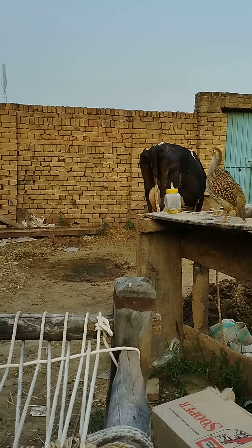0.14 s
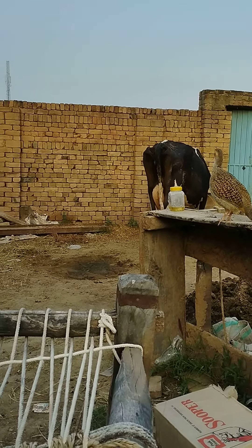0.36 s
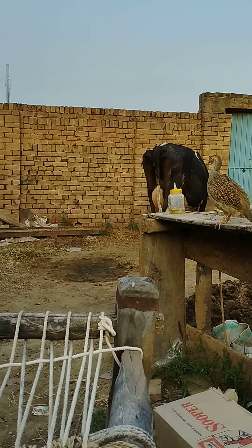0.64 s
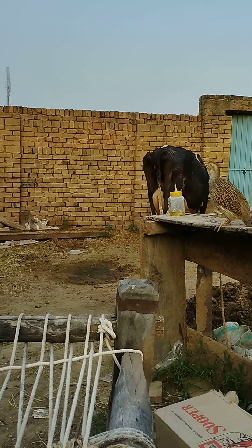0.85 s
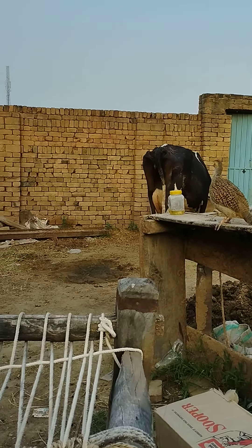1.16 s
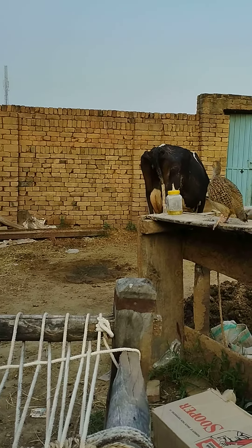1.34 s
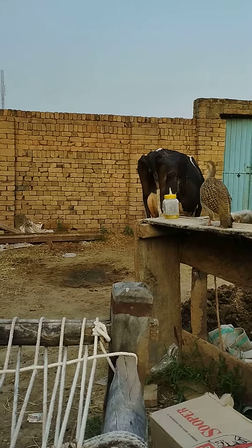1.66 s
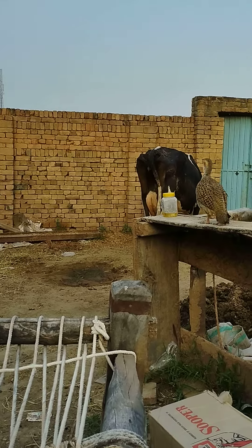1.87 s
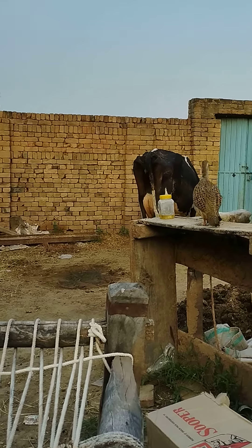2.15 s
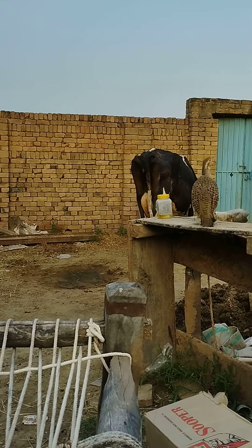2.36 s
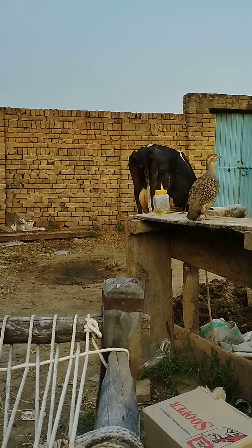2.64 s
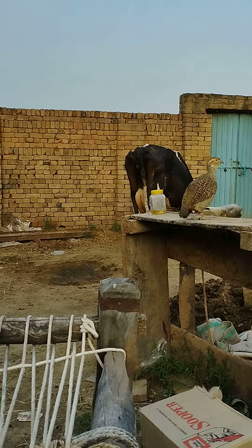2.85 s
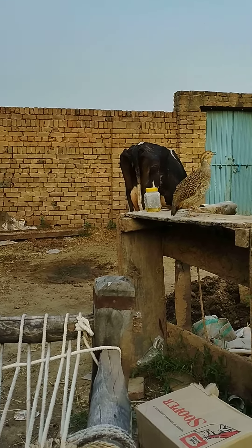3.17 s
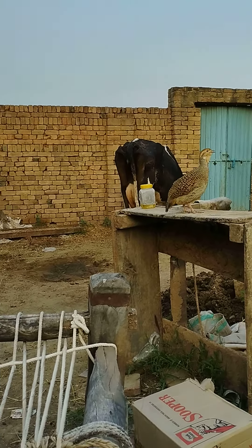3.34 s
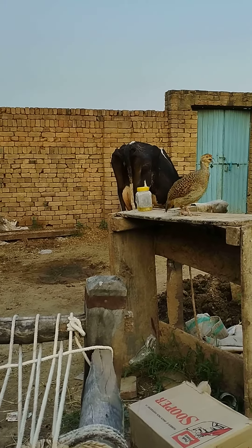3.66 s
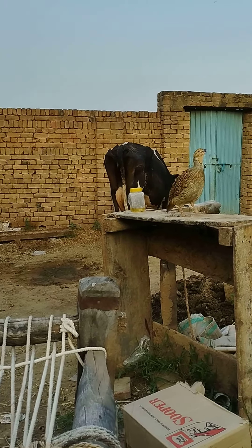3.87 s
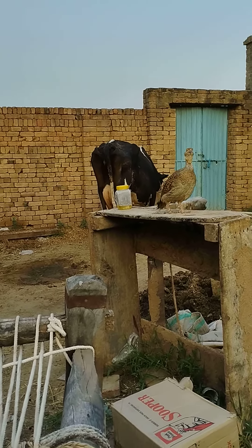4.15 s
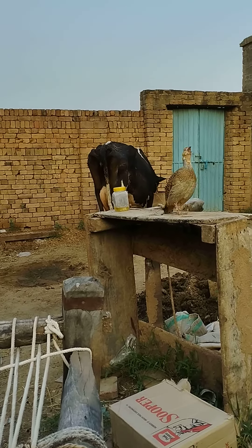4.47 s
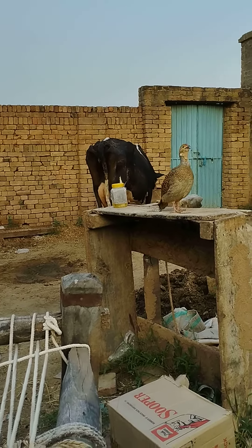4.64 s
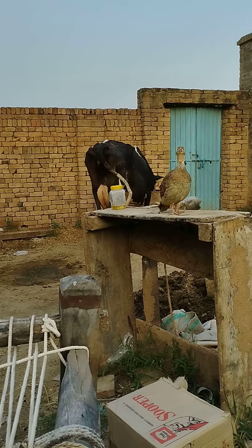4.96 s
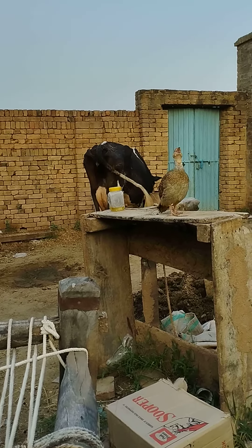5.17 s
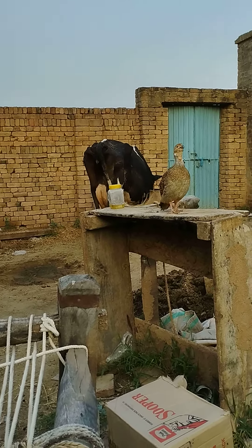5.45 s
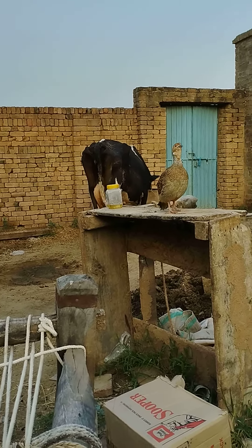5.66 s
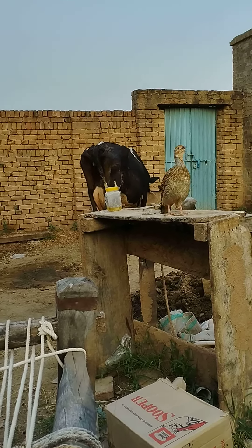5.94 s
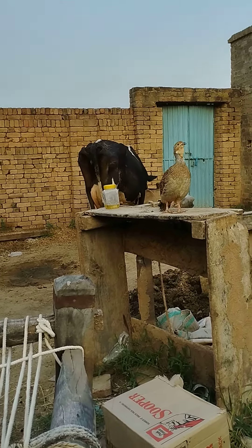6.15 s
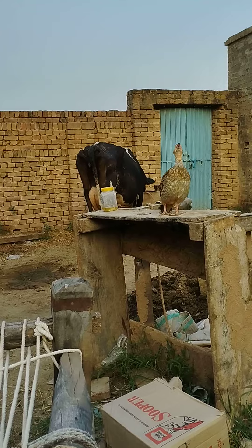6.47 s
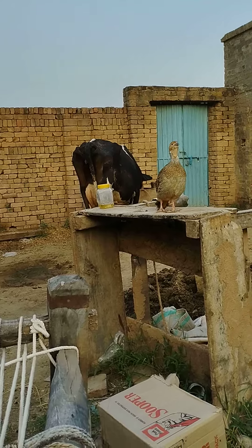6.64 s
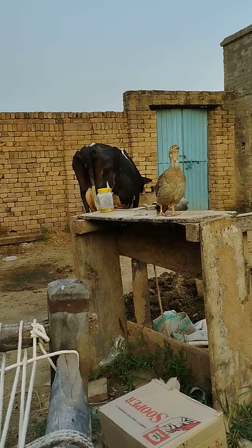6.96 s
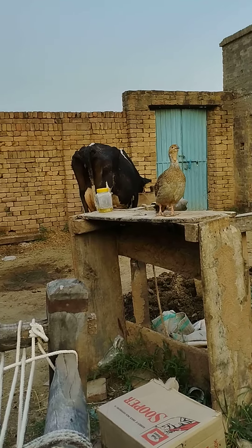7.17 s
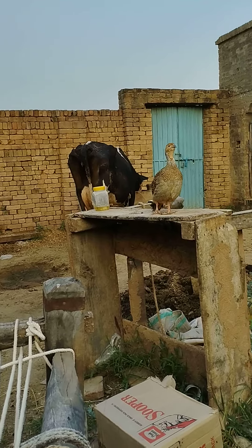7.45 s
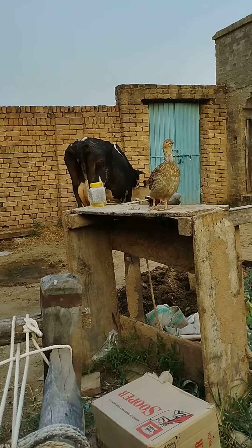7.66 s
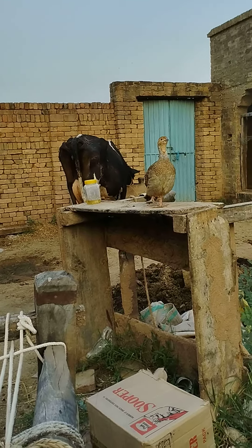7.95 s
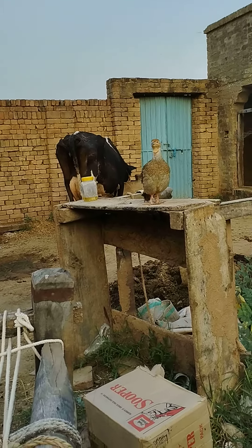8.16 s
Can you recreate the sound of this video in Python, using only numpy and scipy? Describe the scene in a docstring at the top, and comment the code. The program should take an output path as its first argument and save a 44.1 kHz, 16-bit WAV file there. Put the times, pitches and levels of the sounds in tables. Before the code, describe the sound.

Outdoors in a brick-walled yard, two francolins duet loudly from the very start. Each round lasts about 0.7 seconds: a pure, piercing whistle near 2.9 kHz holds for a tenth of a second and flicks upward; a second bird immediately answers with a harsh rasp, short low note, higher note, another rasp and a fast falling note, then two hoarse clucks. Ten rounds run to about 6.9 seconds, slightly quickening, the cackle growing brighter and harsher. Walls return quick echoes and a short tail. A low engine drone hums steadily until about 4 seconds, then fades; soft yard murmur and a very faint pulsing cricket remain. Dull knocks bump near the microphone around 1.4, 2.1 and 2.8 seconds, fainter later. A final whistle comes at 7.0 without an answer. In the quiet, a tiny high chirp sounds near 7.6, with dry ticks from 7.5, clearest at 7.9, until 8.3.

```python
"""Two francolins duet in a walled yard, over an engine drone that later fades and a pulsing cricket.
First comes a pure whistle, a near-sinusoid that bends up at its end; each cackle then answers with a rasp, low note,
high note, rasp and falling note (aperiodic pulses and harmonic tones), followed by two hoarse clucks.
Brick walls return the calls as discrete echoes and a diffuse tail. Dull knocks, decaying sine waves, start later.
Near the end come dry ticks, short noise bursts, and one chirp of a small bird, a gliding sine."""
import sys
import numpy as np
from scipy import signal
from scipy.fft import rfft, irfft, next_fast_len
from scipy.io import wavfile
from scipy.ndimage import uniform_filter1d, minimum_filter1d, map_coordinates

SR = 44100
rng = np.random.default_rng(int(sys.argv[2]) if len(sys.argv) > 2 else 0)


def dump(signal):
    """Clip the signal to [-1, 1] and save it as 16-bit WAV at the path in sys.argv[1]."""
    limited = np.clip(np.atleast_2d(signal).T, -1, 1)
    pcm = np.round(limited * 32767).astype(np.int16)
    wavfile.write(sys.argv[1], SR, pcm)


N = 366471
T = np.arange(N) / SR

# Levels in the tables are relative: envelopes, fluctuation and mix gains follow.
# Whistles: full voice at t/s, hold/s, bend/s, first f/Hz, held f/Hz, last f/Hz, first level/dB, held level/dB,
# left-right level/dB, left lead/us. Each f is the sounding pitch.
WHISTLES = [(-0.07, 0.1, 0.021, 2910, 2940, 3230, -16, -14.5, 7.5, 59),
            (0.649, 0.1, 0.059, 2927, 2918, 3270, -15.5, -12, 2, 62),
            (1.433, 0.11, 0.035, 3007, 2956, 3280, -15, -13, 6, 60.5),
            (2.162, 0.096, 0.048, 2943, 2963, 3330, -15, -14, 6.5, 56.5),
            (2.906, 0.12, 0.058, 2950, 2925, 3390, -16, -13, 3.5, 53.5),
            (3.636, 0.12, 0.038, 2932, 2957, 3190, -16, -14, 4, 27),
            (4.324, 0.13, 0.044, 2923, 2978, 3360, -15.5, -15, 4.5, 7),
            (5.033, 0.12, 0.037, 2958, 2922, 3280, -17, -14.5, 1.5, 4),
            (5.737, 0.11, 0.049, 2982, 2941, 3150, -17.5, -15, 3.5, -9.5),
            (6.355, 0.09, 0.058, 2903, 2915, 3250, -14, -12.5, 0.8, -7.5),
            (6.969, 0.11, 0.046, 2932, 2966, 3380, -15.5, -15, 3, -30)]
# Faint broadband noise that rises and falls with the whistle: f/Hz, spectral level/dB per Hz
NOISE_SPECTRUM = [(300, -1), (1750, 1), (2600, -11), (3500, -3), (4100, 3.5), (4700, -6), (6050, -6),
                  (7370, -18.5), (7900, -44), (9290, -20), (11100, -29), (15500, -12)]
# Other partials against the main one: f/Hz, level/dB
OVERTONES = [(800, -27), (1700, -22.5), (3300, -15), (4060, -14), (5070, -8.5), (6100, -19.5), (7260, -23),
             (8560, -50), (9940, -38.5), (10900, -50), (12500, -33.5), (15500, -41)]
# Background: t/s, engine level/dB, yard murmur level/dB, ground rumble level/dB
BACKGROUND = [(0.0, -51.5, -55.5, -60.5), (1.25, -51, -55, -60.5), (3.77, -52.5, -58, -59.5),
              (4.6, -64.5, -59.5, -63.5), (5.2, -68, -58, -64.5), (6.5, -76.5, -59.5, -68.5),
              (7.15, -67, -55.5, -62), (7.4, -66, -64, -65), (8.31, -69.5, -64, -64)]
# Background spectra: f/Hz, spectral level/dB per Hz
ENGINE_SPECTRUM = [(42, -37.5), (72, -4.5), (119, 6), (188, -12.5), (260, -18), (340, -45), (570, -120)]
RUMBLE_SPECTRUM = [(25, -9), (33, -6), (41, 9.5), (52, -8), (80, -47.5)]
YARD_SPECTRUM = [(53, -30), (90, 0), (195, -17.5), (237, -6), (357, -11), (727, -16), (2770, -32),
                 (5880, -42), (6550, -39), (7600, -56), (10300, -58), (15500, -44)]
# Rasps of the cackle: t/s, peak level/dB, length/s, treble level/dB
RASPS = [(0.0264, -11.5, 0.033, -11.5), (0.102, -19.5, 0.036, 3.5), (0.79, -12.5, 0.028, -12.5),
         (0.863, -17.5, 0.024, 4), (1.5894, -12.5, 0.026, -30), (1.6713, -19, 0.023, 2),
         (2.2852, -12, 0.034, -24.5), (2.3627, -13, 0.017, -0.5), (3.035, -13.5, 0.039, -0.5),
         (3.112, -12.5, 0.012, 0.5), (3.756, -10.5, 0.026, 1.5), (3.833, -14, 0.017, 0),
         (4.443, -10.5, 0.026, 2), (4.523, -13.5, 0.011, -0.5), (5.2516, -10, 0.034, 2),
         (5.328, -12, 0.018, 0), (5.876, -11, 0.035, 2), (5.9435, -16, 0.023, 3), (6.5045, -8, 0.0314, 4.5),
         (6.5816, -10.5, 0.02, 3.5)]
# Throat resonances in the rasp: f/Hz, spectral level/dB per Hz
RASP_THROAT = [(500, -37), (1000, -9.5), (1300, -16), (2050, 2.5), (3300, -3), (4250, -9), (5300, -3.5),
               (7000, -14.5), (8500, -35.5), (10000, -29), (11200, -50.5), (12500, -28.5), (15500, -39.5)]
# Top treble of the cackle: t/s, level/dB
CACKLE_TOP = [(0, -3.5), (1.6, -10), (2.3, -4), (3.8, 1.5), (4.5, 2), (6.6, 0.5)]
# Direct sound of cackle and clucks: f/Hz, left-right level/dB
CACKLE_PAN = [(700, -0.5), (1220, 1.5), (2010, -4), (4400, -7.5), (8000, -4), (15000, 6.5)]
# First wall echoes: left delay t/s, level/dB
WALLS = [(.034, -11.5), (.047, -23.5), (.071, -34.5)]
# Low notes of the cackle: t/s, length/s, f/Hz (the sounding pitch), first level/dB, last level/dB
LOW_NOTES = [(0.06, 0.0093, 2072, -11.5, -16.5), (0.824, 0.011, 2101, -12, -12),
             (1.621, 0.014, 2076, -14.5, -13), (2.32, 0.009, 2157, -15.5, -16.5),
             (3.068, 0.016, 2087, -12.5, -16), (3.785, 0.017, 2050, -13, -19.5),
             (4.472, 0.026, 2070, -15, -14.5), (5.278, 0.027, 2044, -17, -13),
             (5.909, 0.019, 2050, -16, -15), (6.535, 0.023, 2073, -15, -16.5)]
# High notes, every third cycle stronger: t/s, length/s, f/Hz, last f/Hz, level/dB
HIGH_NOTES = [(0.072, 0.046, 2534, 2497, -21), (0.838, 0.027, 2543, 2630, -20),
              (1.638, 0.038, 2550, 2477, -22), (2.332, 0.03, 2500, 2620, -17),
              (3.09, 0.023, 2536, 2484, -21.5), (3.806, 0.026, 2565, 2420, -18.5),
              (4.497, 0.021, 2513, 2214, -16.5), (5.31, 0.019, 2496, 1845, -15.5),
              (5.932, 0.018, 2428, 1842, -17), (6.557, 0.02, 2485, 2004, -16.5)]
# Falling notes: t/s, hold/s, drop/s, first f/Hz, f/Hz before the drop, first level/dB, level/dB before the drop,
# level/dB in the drop, landing level/dB
FALLS = [(0.116, 0.022, 0.022, 2030, 2074, -15, -13.5, -42, -27),
         (0.882, 0.023, 0.024, 2250, 2406, -20, -20, -38, -25),
         (1.686, 0.022, 0.019, 2508, 2307, -18, -22.5, -35, -25),
         (2.379, 0.026, 0.018, 2085, 1902, -12.5, -12, -36.5, -24.5),
         (3.127, 0.018, 0.026, 2057, 1992, -12.5, -11, -18.5, -22),
         (3.844, 0.019, 0.025, 2095, 1986, -20, -11.5, -15.5, -22),
         (4.532, 0.022, 0.017, 2089, 1894, -17.5, -11, -17.5, -22.5),
         (5.345, 0.024, 0.012, 2038, 1820, -18, -12.5, -19.5, -20),
         (5.964, 0.024, 0.011, 2030, 1820, -16.5, -12.5, -22, -19),
         (6.596, 0.021, 0.015, 2067, 1803, -16, -13, -25.5, -24)]
# Clucks: t/s, hoarse peak level/dB, treble level/dB, delay/s to the voice peak, f/Hz, last f/Hz,
# voice level/dB, voice fade/s
CLUCKS = [(0.2781, -20.5, 6, 0.03, 1427, 1385, -17.5, 0.0048),
          (0.4426, -18.5, 2, 0.025, 1321, 1057, -28, 0.023),
          (1.047, -25, 16.5, 0.032, 1487, 1400, -18.5, 0.0046),
          (1.214, -17.5, -2, 0.029, 1241, 1124, -31.5, 0.03),
          (1.845, -20.5, 9.5, 0.028, 1413, 1380, -22, 0.005),
          (2.0073, -17.5, -1, 0.02, 1306, 1150, -30.0, 0.023),
          (2.5483, -22, 8.5, 0.025, 1459, 1418, -18.5, 0.0093),
          (2.7107, -17.5, -3.5, 0.024, 1242.0, 1200, -25, 0.011),
          (3.2995, -20.5, 12.5, 0.033, 1353, 1360, -23.5, 0.0045),
          (3.4663, -19, -1.5, 0.021, 1210, 1110, -26.5, 0.03),
          (4.0232, -18.5, 8, 0.021, 1400, 1360, -22, 0.007),
          (4.1771, -17, -1.5, 0.026, 1239, 1068, -30, 0.03),
          (4.6993, -19.5, 10, 0.028, 1348, 1290, -20.5, 0.007),
          (4.862, -15, -4.5, 0.033, 1219, 1158, -28.5, 0.009),
          (5.5017, -17.5, 8, 0.031, 1366, 1117, -26, 0.03),
          (5.6553, -17, -7.5, 0.031, 1176, 1056, -31.5, 0.026),
          (6.1192, -18.5, 8.0, 0.031, 1213, 1080, -27, 0.023),
          (6.277, -17.0, -11, 0.029, 1155, 1093, -34, 0.025),
          (6.748, -16.0, 6.5, 0.026, 1373.0, 1073, -24.5, 0.023),
          (6.904, -17.5, -13, 0.031, 1133, 1050, -30.5, 0.022)]
# Throat resonances in the cluck: f/Hz, spectral level/dB per Hz
CLUCK_THROAT = [(180, -42.5), (300, -10), (603, -15), (1730, 0), (2170, -14.5), (2920, -18.5), (3890, -23),
                (5790, -19.5), (9000, -52.5), (11700, -88.5), (19800, -120)]
# Thin bright notes that end some clucks: t/s, length/s, first f/Hz, last f/Hz, level/dB
SQUEAKS = [(0.313, 0.025, 1964, 1830, -31), (1.077, 0.029, 2028, 1960, -31),
           (1.88, 0.028, 1985, 1840, -35.5), (2.58, 0.028, 1978, 1790, -33.5),
           (3.338, 0.018, 1980, 1790, -30), (4.05, 0.022, 1902, 1760, -31.5),
           (4.732, 0.019, 1822, 1760, -34)]
# Dull knocks: t/s, peak level/dB, f/Hz
THUMPS = [(1.374, -32.5, 281), (2.076, -32.5, 200), (2.827, -34, 220), (4.958, -51, 180), (5.677, -38, 250),
          (7.18, -42, 150)]
# Dry ticks: t/s, level/dB
TICKS = [(7.466, -57), (7.5293, -53), (7.84, -57), (7.885, -46), (7.9136, -35.5), (8.135, -60)]
# Chirp of a small bird: t/s, f/Hz, level/dB
CHIRP = [(7.555, 5040, -79), (7.58, 4870, -57), (7.66, 4930, -72.5), (7.9, 4820, -83)]

WHISTLE_START_S, WHISTLE_START_DB, WHISTLE_FLAT_HZ = .045, -39.5, 48.6   # faint, slightly flat start
WHISTLE_RISE_S, WHISTLE_RISE_DB = 0.013, -5   # last stretch of the attack
WHISTLE_ENDS_DB = -0.5   # the hold eases after its middle
BEND_KNEE, BEND_KNEE_PITCH, BEND_KNEE_DB, BEND_END_DB = .58, .3, -5.5, -13.5   # the bend steepens and fades
CRICKET_HZ, CRICKET_DB = 6500, -74.5
TOP_PARTIAL_HZ = 9900   # above this the voice is mostly hiss
AIR_DB, AIR_LINGERS_S = -4, .012   # that hiss follows the cry and lingers
PORT_LAG_S = .0001
YARD_T60_S, YARD_CUT_HZ = 0.32, 5130
HIGH_HOLD = .62   # share of the note held before the pitch moves to its last value
FALL_SAG_EARLY = 0.44   # share of the slow sag done at mid-hold
DROP_KNEE, DROP_KNEE_PITCH = 0.74, .45   # share of the drop's time and depth at its knee
LANDING_HZ, LANDING_S, LANDING_FADE_DB = 1397, 0.0083, -2   # every fall lands on one short tone
CLUCK_SWELL_S, CLUCK_SWELL_DB, CLUCK_FADE_DB = .017, -12.5, -8
CLUCK_SHARP_HZ, CLUCK_SAG_SHARE = 60, .4   # starts sharp; the sag is done after this share of the fade
THUMP_S = 0.002   # rise time of the knock's envelope
CEILING, CUTOFF_HZ = .9, 15800


def amp(db):
    """The decibel: an amplitude ratio is 10 to the power level/20."""
    return 10 ** (np.asarray(db) / 20)


def rms_one(x):
    """Normalisation to unit root mean square."""
    return x / np.sqrt(np.mean(x ** 2) + 1e-20)


def in_time(rows):
    """Linear interpolation of table columns to one value per sample."""
    s, *columns = np.transpose(rows)
    return [np.interp(T, s, column) for column in columns]


def at_hz(points, hz):
    """Interpolation of a spectrum on a logarithmic frequency axis."""
    table_hz, table_db = np.transpose(points)
    return np.interp(np.log(hz), np.log(table_hz), table_db)


def filtered(x, order, hz, kind):
    """Butterworth filtering: a maximally flat passband."""
    return signal.sosfilt(signal.butter(order, hz, kind, fs=SR, output="sos"), x)


def coloured(x, spectrum):
    """Spectral shaping by a tabulated response that also falls off below its first frequency."""
    size = next_fast_len(N, real=True)
    grid = np.maximum(np.fft.rfftfreq(size, 1 / SR), 1)
    gain = amp(at_hz(spectrum, grid)) * np.minimum(grid / spectrum[0][0], 1) ** 2
    return rms_one(irfft(rfft(x, size) * gain, size)[:N])


def drift(rate_hz):
    """Slow random fluctuation of unit rms: low-passed white noise."""
    return rms_one(filtered(rng.standard_normal(N), 2, rate_hz, "low"))


def brighten(x, db, corner_hz, kind="high"):
    """Directivity: treble grows when the beak points at the listener; kind "low" scales the lows instead."""
    return x + (amp(db) - 1) * filtered(x, 2, corner_hz, kind)


def notes(tables, multiples, wobble, shimmer_db, edge_s, overtone_db, between_db=0, broken_db=0):
    """Membrane oscillation: partials on (t/s, f/Hz, level/dB) curves, slightly unsteady, coloured by the beak."""
    out, waver, shimmer = np.zeros(N), drift(250), np.clip(drift(200), -2, 1)
    for rows in tables:
        s, hz, db = np.transpose(rows)
        on = slice(max(int((s[0] - edge_s) * SR), 0), int((s[-1] + edge_s) * SR))
        t = T[on]
        pitch = np.interp(t, s, hz)
        curve_db = np.interp(t, s, db)
        phase = 2 * np.pi * np.cumsum(pitch * (1 + wobble * waver[on])) / SR
        edge = np.clip(np.minimum(t - s[0], s[-1] - t) / edge_s + 1, 0, 1) ** 2
        wave = np.sin(phase)
        effort_db = 0.16 * (curve_db - db.max())   # soft stretches are purer
        for k in multiples:
            level_db = at_hz(OVERTONES, k * pitch) + effort_db + overtone_db
            level_db += between_db * (k % 1 > 0)   # partials between the harmonics
            level_db += broken_db * np.roll(waver, int(k * 9000))[on]   # each partial flickers on its own
            top_loss = 1 + (k * pitch / TOP_PARTIAL_HZ) ** 6
            wave += amp(level_db) * np.sin(k * phase + k * k) / top_loss
        out[on] += np.sqrt(2) * amp(curve_db + shimmer_db * shimmer[on]) * edge * wave
    return out


def chaos(throat, per_s, spread_db, air):
    """Aperiodic excitation: membranes slap at uneven gaps and strengths, with air noise, through the throat."""
    gaps = SR / per_s * rng.uniform(.78, 1.22, int(per_s * N / SR * 2))
    at = np.cumsum(gaps).astype(int)
    at = at[at < N]
    pulses = air * rng.standard_normal(N)
    pulses[at] += amp(spread_db * np.clip(rng.standard_normal(len(at)), -2, 2))
    return coloured(pulses, throat)


def bursts(rows, attack_s, release_s):
    """Transient envelopes: linear attack, hold to the row's length, exponential decay."""
    out = np.zeros(N)
    for s, db, length in np.array(rows)[:, :3]:
        on = slice(int(s * SR), int((s + .25) * SR))
        t = T[on] - s
        shape = np.clip(t / attack_s, 0, 1) * np.exp(-np.maximum(t - length, 0) / release_s)
        out[on] += amp(db) * shape
    return out


def whistle_shape(s, hold, bend, first_hz, hz, last_hz, first_db, db, *place):
    """Frequency and level modulation: faint start, swelling hold, upward bend."""
    knee = s + hold
    return [(s - WHISTLE_START_S, first_hz - WHISTLE_FLAT_HZ, first_db + WHISTLE_START_DB),
            (s - WHISTLE_RISE_S, first_hz, first_db + WHISTLE_RISE_DB), (s, first_hz, first_db),
            (s + hold / 2, hz, db), (knee, hz, db + WHISTLE_ENDS_DB),
            (knee + BEND_KNEE * bend, hz + BEND_KNEE_PITCH * (last_hz - hz), db + BEND_KNEE_DB),
            (knee + bend, last_hz, db + BEND_END_DB)]


def whistler():
    """Near-sinusoidal tone with one weak overtone, and faint broadband noise that rises and falls with it."""
    tone = notes([whistle_shape(*row) for row in WHISTLES], [2], wobble=0.00036, shimmer_db=0.43,
                 edge_s=0.011, overtone_db=-18.5)
    level = np.abs(uniform_filter1d(np.abs(tone), size=1800))
    tone = tone * amp(0.93 * drift(25.0))   # the level is never quite even
    white = rng.standard_normal((2, N)) + rng.standard_normal(N)   # partly shared by both sides
    noise = amp(-34.5) * level ** 0.4 * np.array([coloured(side, NOISE_SPECTRUM) for side in white])
    return tone, noise


def whistle_sides(tone):
    """Binaural cues: interaural differences of time and level, moving from call to call."""
    pan_db, lead_us = in_time(WHISTLES)[-2:]
    shift = lead_us * 1e-6 * SR / 2   # samples, half to each side
    sides = [map_coordinates(tone, [np.arange(N) + sign * shift], order=3, mode="nearest") for sign in (1, -1)]
    return np.array(sides) * amp([pan_db / 2, -pan_db / 2])


def background():
    """Stationary noise under slow gains: engine drone, yard murmur and rumble, much alike on both sides."""
    engine_db, yard_db, rumble_db = in_time(BACKGROUND)
    both, left, right = rng.standard_normal((3, N))
    sides = [both + .2 * left, both + .2 * right]
    other_sides = np.roll(sides, N // 2, axis=1)
    engine = amp(engine_db + 0.99 * drift(5.3)) * np.array([coloured(n, ENGINE_SPECTRUM) for n in sides])
    yard = amp(yard_db) * np.array([coloured(n, YARD_SPECTRUM) for n in sides])
    rumble_gain = amp(rumble_db + 7.5 + 1.5 * drift(2.0))
    rumble = rumble_gain * np.array([coloured(n, RUMBLE_SPECTRUM) for n in other_sides])
    return engine + yard + rumble


def cricket():
    """Amplitude modulation: a wing resonance, as narrow-band noise, in short regular pulses."""
    gate = np.sin(np.pi * 9.63 * T + .1 * drift(2.0)) ** 4   # about 9.63 pulses a second
    band = [(CRICKET_HZ * .9, -30), (CRICKET_HZ, 0), (CRICKET_HZ * 1.1, -30)]
    return amp(CRICKET_DB) * gate * coloured(rng.standard_normal(N), band)


def yard_echo(x):
    """Reverberation: a few wall reflections, then a diffuse tail, other on each side, band-limited."""
    t = T[:int(.8 * SR)]
    decay = amp(-60 * t / YARD_T60_S)
    onset = np.clip(t / 0.0079 - 1, 0, 1)
    response = amp(-37.5) * rng.standard_normal((2, len(t))) * decay * onset
    for lag_s, db in WALLS:
        response[0, int(lag_s * SR)] += amp(db)
        response[1, int(lag_s * SR * 1.04)] += amp(db)
    dull = filtered(x, 2, [900, YARD_CUT_HZ], "band")
    return signal.fftconvolve(dull[None], response, axes=1)[:, :N]


def fall_shape(s, hold, drop, first_hz, hz, first_db, db, drop_db, landing_db):
    """Downward frequency glide: a hold with a slow sag, a fast drop, a short landing."""
    knee = s + hold
    landing = knee + drop
    return [(s, first_hz, first_db),
            (s + hold / 2, first_hz + FALL_SAG_EARLY * (hz - first_hz), (first_db + db) / 2),
            (knee, hz, db),
            (knee + DROP_KNEE * drop, hz + DROP_KNEE_PITCH * (LANDING_HZ - hz), drop_db),
            (landing, LANDING_HZ, landing_db), (landing + LANDING_S, LANDING_HZ, landing_db + LANDING_FADE_DB)]


def cackle_notes():
    """Harmonic oscillation in the low and falling notes; period tripling in the high ones."""
    low = [[(s, hz, db), (s + length, hz * .99, last_db)] for s, length, hz, db, last_db in LOW_NOTES]
    voiced = notes(low, range(2, 8), wobble=0.0025, shimmer_db=-2.6, edge_s=0.0036, overtone_db=5.5, broken_db=1.5)
    high = [[(s, hz, db), (s + HIGH_HOLD * length, hz, db), (s + length, last_hz, db)]
            for s, length, hz, last_hz, db in HIGH_NOTES]
    thirds = [k / 3 for k in range(1, 19) if k != 3]   # the main partial is already there
    voiced += notes(high, thirds, wobble=.008, shimmer_db=0.5, edge_s=0.0041, overtone_db=2,
                    between_db=-6.0, broken_db=4.0)
    falls = [fall_shape(*row) for row in FALLS]
    voiced += notes(falls, range(2, 8), wobble=0.0024, shimmer_db=1.67, edge_s=.002, overtone_db=-6.5, broken_db=4.0)
    return voiced


def cackler():
    """Alternation of chaotic and periodic oscillation; a thin rasp leaks under the notes."""
    voiced = cackle_notes()
    slaps = chaos(RASP_THROAT, per_s=1100.0, spread_db=2.0, air=0.24)
    rasp = slaps * amp(-9.5) * bursts(RASPS, 0.0044, 0.0012)
    leak = amp(-27) * uniform_filter1d(np.abs(voiced), size=200) * slaps
    keep = np.exp(-1 / (AIR_LINGERS_S * SR))
    effort = signal.lfilter([1 - keep], [1, -keep], np.abs(voiced + rasp))
    top = filtered(np.roll(slaps, N // 2), 6, TOP_PARTIAL_HZ, "high")
    air = amp(AIR_DB) * effort * top
    cry = brighten(voiced + rasp + leak + air, in_time(RASPS)[2], corner_hz=3000)
    return brighten(cry, in_time(CACKLE_TOP)[0], corner_hz=4300)


def ports(x):
    """Delay and diffraction: sound reaches the left port first, and the housing shades each port in its own way."""
    size = next_fast_len(N, real=True)
    hz = np.fft.rfftfreq(size, 1 / SR)
    half = amp(at_hz(CACKLE_PAN, hz + 1) / 2) * np.exp(1j * np.pi * hz * PORT_LAG_S)
    return irfft(rfft(x, size) * np.array([half, 1 / half]), size)[:, :N]


def cluck_shape(s, burst_db, bright_db, after, hz, last_hz, db, fade):
    """Frequency and level modulation: the voice swells inside the burst, then sags and fades."""
    top = s + after
    return [(top - CLUCK_SWELL_S, hz + CLUCK_SHARP_HZ, db + CLUCK_SWELL_DB), (top, hz, db),
            (top + CLUCK_SAG_SHARE * fade, last_hz, db + CLUCK_SAG_SHARE * CLUCK_FADE_DB),
            (top + fade, last_hz, db + CLUCK_FADE_DB)]


def clucks():
    """Aperiodic bursts with a short voiced core; the treble swells as the beak opens."""
    voiced = notes([cluck_shape(*row) for row in CLUCKS], range(2, 6), wobble=0.038, shimmer_db=1.5,
                   edge_s=0.0034, overtone_db=-14)
    # the pitch holds, then droops while the note fades
    squeaks = [[(s, hz, db), (s + .55 * length, hz, db - 1.5), (s + length, last_hz, db - 8)]
               for s, length, hz, last_hz, db in SQUEAKS]
    voiced += notes(squeaks, [2, 3], wobble=.01, shimmer_db=4.0, edge_s=0.0083, overtone_db=6.5)
    slaps = chaos(CLUCK_THROAT, per_s=1200.0, spread_db=1.5, air=0.12)
    body = bursts([(s, db - 16.0, .04) for s, db, *rest in CLUCKS], .004, 0.027)
    opening = bursts([(s + 0.0011, db + bright - 18, .025) for s, db, bright, *rest in CLUCKS], .014, 0.015)
    hoarse = brighten(slaps, -10.5, corner_hz=760) * body
    treble = brighten(slaps, -22, corner_hz=2360, kind="low") * opening
    return voiced + hoarse + treble


def knocks():
    """Damped oscillation: dull knocks near the microphone, each a sine that rises and dies fast."""
    out = np.zeros(N)
    t = T[:3000]
    envelope = t / THUMP_S * np.exp(1 - t / THUMP_S)
    for s, db, hz in THUMPS:
        out[int(s * SR):][:3000] += amp(db) * np.sin(2 * np.pi * hz * t) * envelope
    return out


def ticks():
    """Impulsive noise: dry ticks, band-shaped with a sharp attack and exponential decay."""
    envelope = bursts([(s, db - 16, 0) for s, db in TICKS], 0.00092, 0.022)
    return envelope * coloured(rng.standard_normal(N), [(1500, -14), (4000, -3), (7000, 0), (9000, -25)])


def small_bird():
    """Frequency modulation: one gliding sine without overtones, fluctuating in level."""
    chirp = notes([CHIRP], [], wobble=.002, shimmer_db=4.0, edge_s=.005, overtone_db=0)
    return chirp * amp(3.5 * drift(30.0))


def scene():
    """Superposition of both birds, their echoes and the yard."""
    tone, noise = whistler()
    whistle = whistle_sides(tone) + amp(-17.0) * yard_echo(tone) + noise
    cry, cluck = cackler(), clucks()
    cackle = amp(2.0) * ports(cry + cluck) + yard_echo(amp(-0.5) * cry + amp(-1.5) * cluck)
    return whistle + background() + cricket() + cackle + knocks() + ticks() + small_bird()


def record(dry):
    """Peak limiting and low-pass filtering: a fast gain holds the loudest notes down, the top is cut."""
    allowed = np.minimum(CEILING / (np.abs(dry).max(axis=0) + 1e-9), 1)
    gain = uniform_filter1d(minimum_filter1d(allowed, size=241), size=121)
    return signal.sosfilt(signal.cheby2(16, 60, CUTOFF_HZ, fs=SR, output="sos"), gain * dry)


dry = scene()
out = record(dry)
dump(out)
```